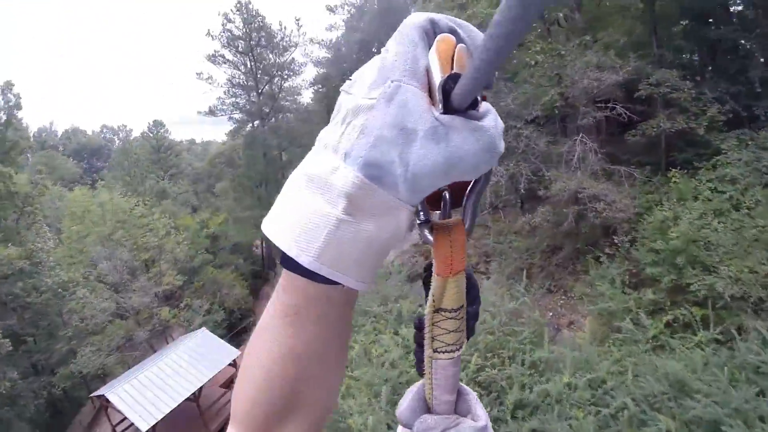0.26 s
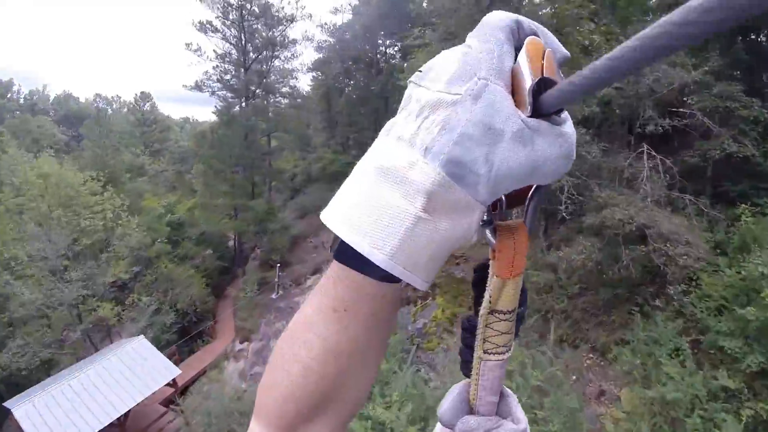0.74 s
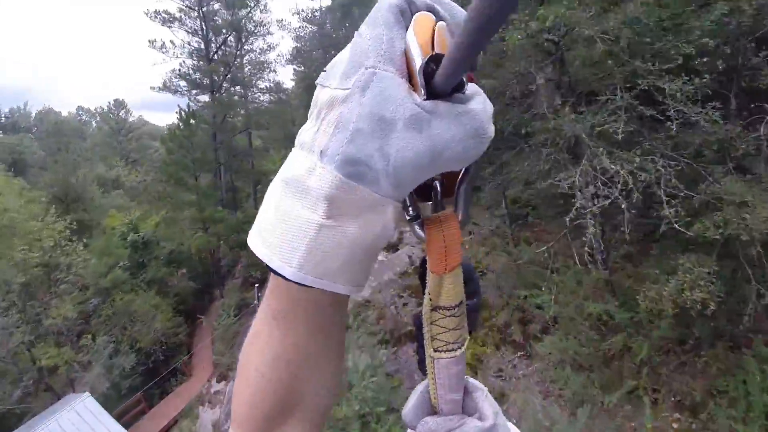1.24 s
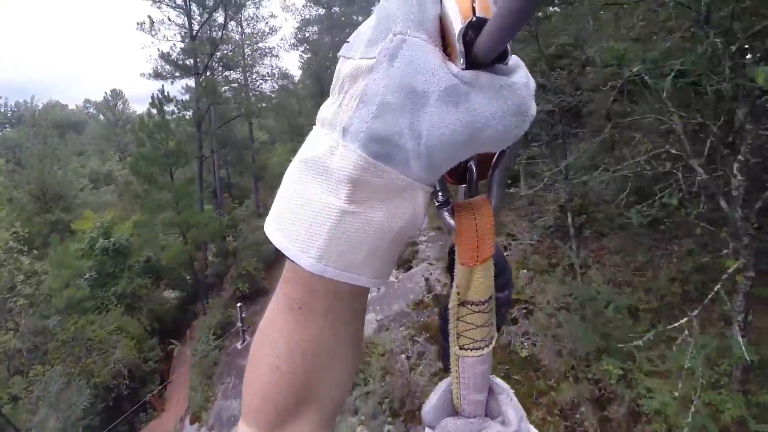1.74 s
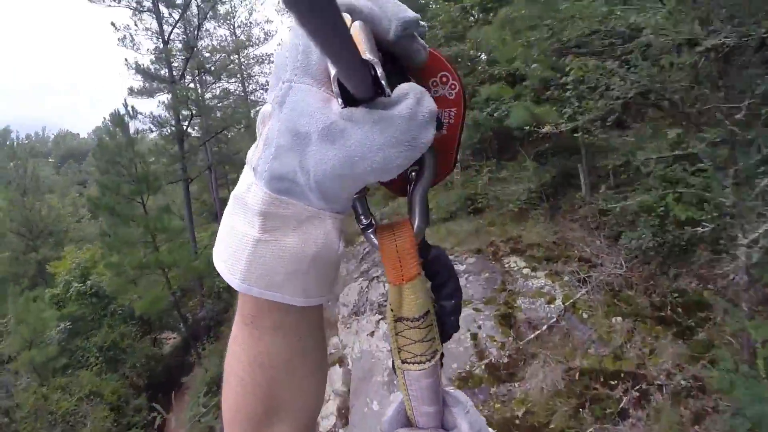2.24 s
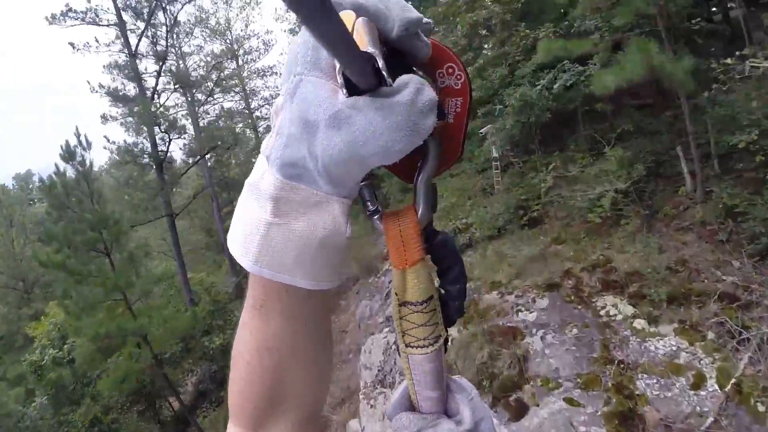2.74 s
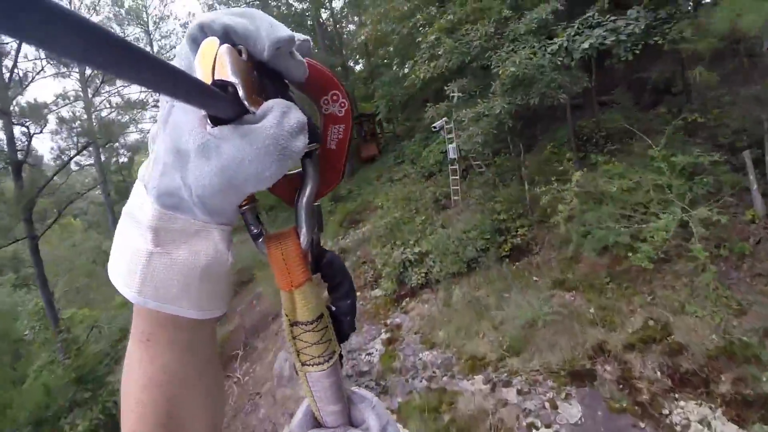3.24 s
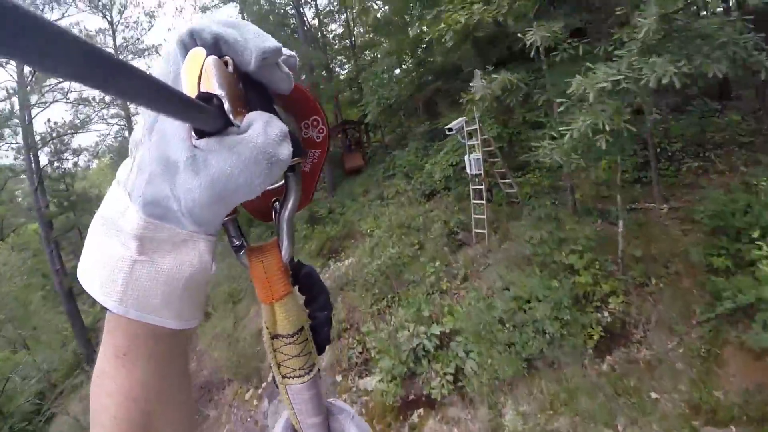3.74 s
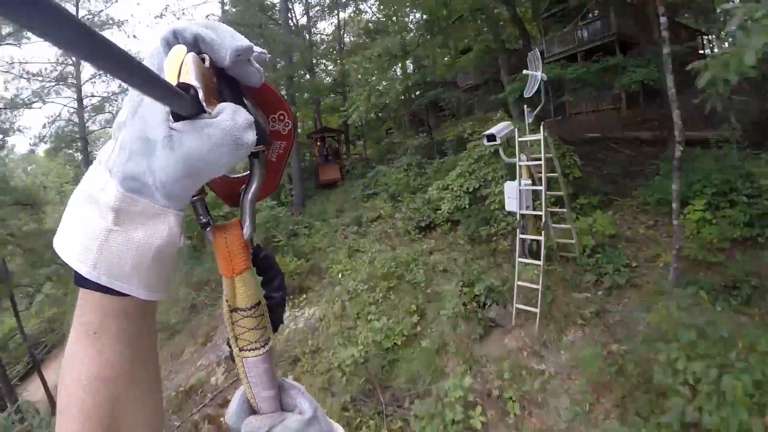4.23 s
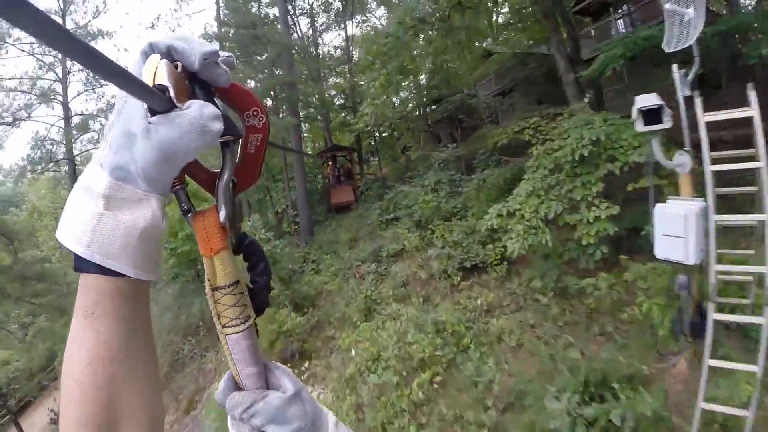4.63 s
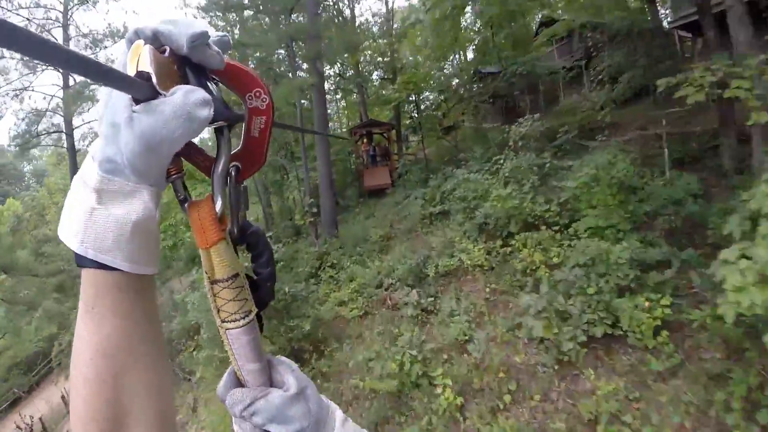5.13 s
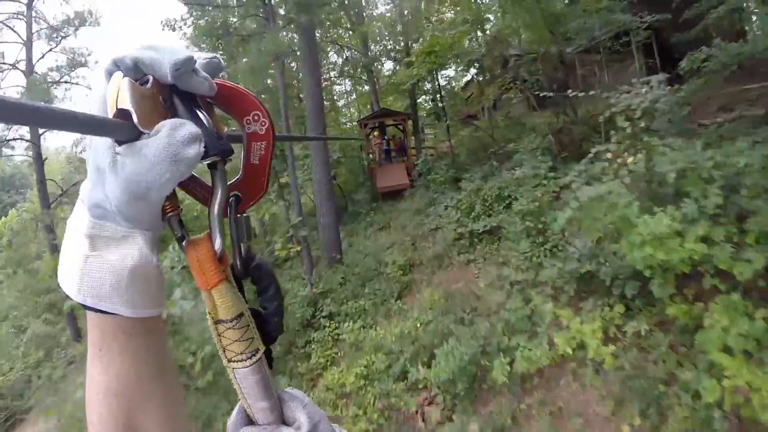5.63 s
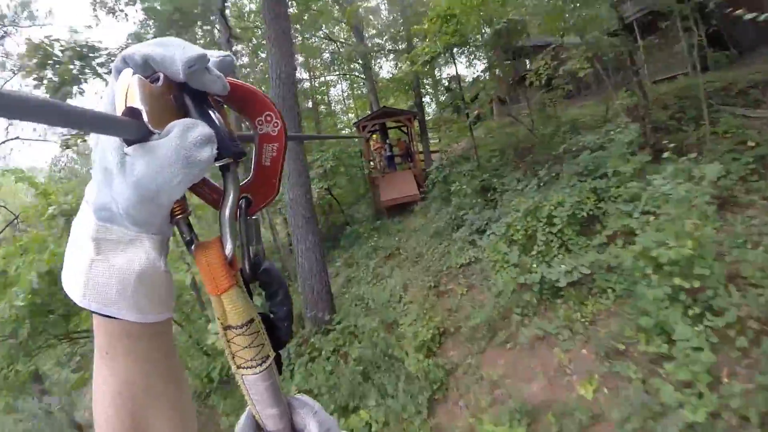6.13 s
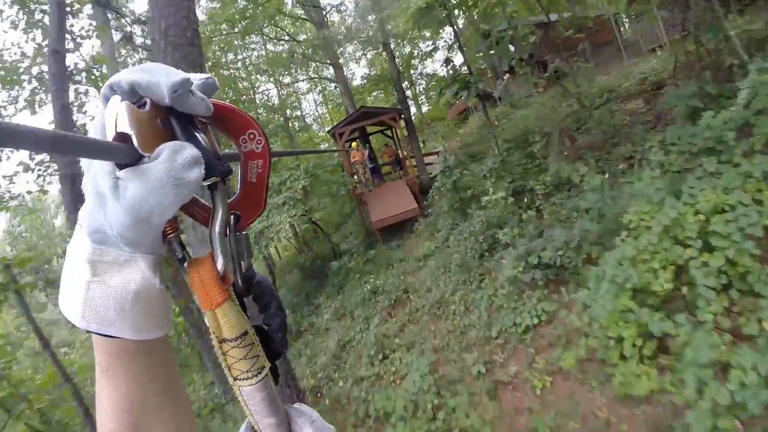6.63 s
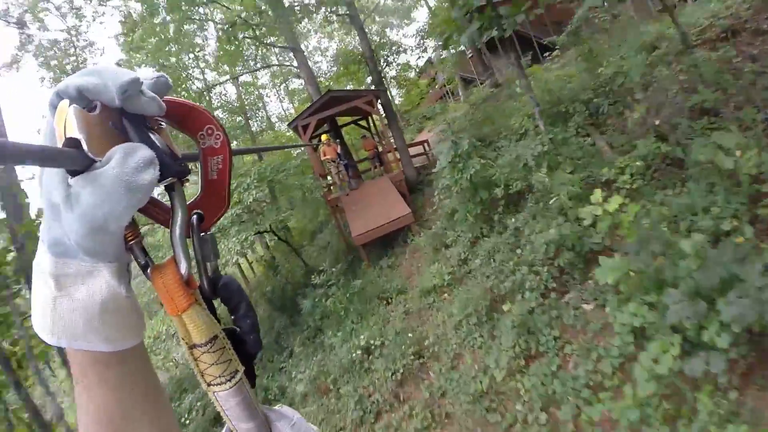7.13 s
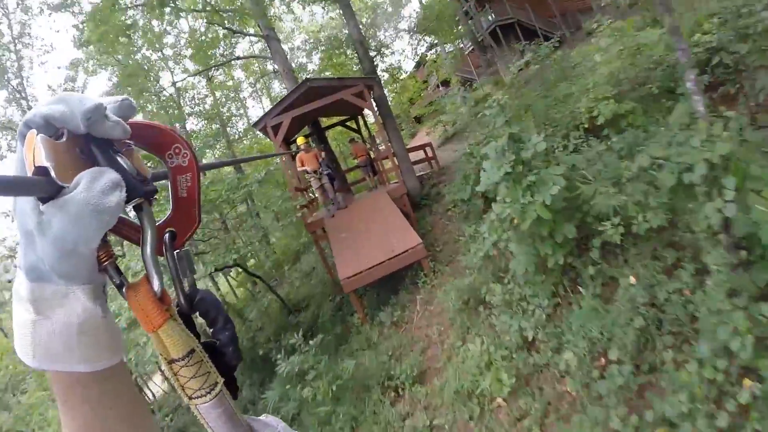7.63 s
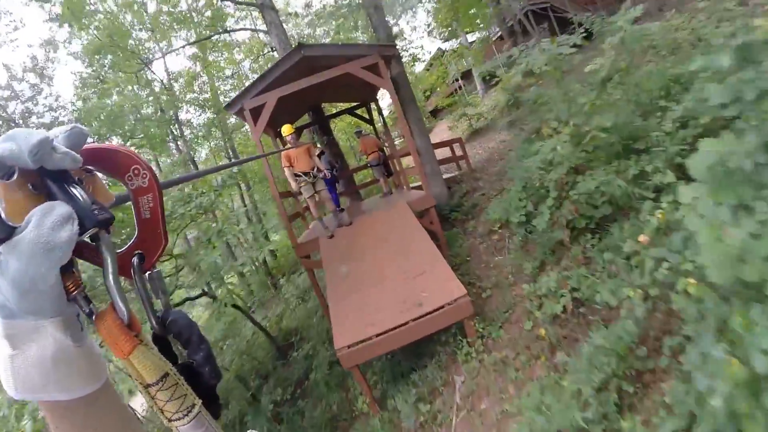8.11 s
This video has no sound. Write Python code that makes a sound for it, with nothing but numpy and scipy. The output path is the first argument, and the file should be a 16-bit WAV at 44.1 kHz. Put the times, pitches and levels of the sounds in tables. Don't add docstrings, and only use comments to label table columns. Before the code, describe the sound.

A zipline trolley grinds and rings loudly along a steel cable, its metallic whir shifting in tone as wind rumbles close to the rider's helmet.

```python
import sys
import numpy as np
from scipy import signal
from scipy.fft import rfft, irfft
from scipy.io import wavfile
from scipy.ndimage import uniform_filter1d

SR = 44100
rng = np.random.default_rng(int(sys.argv[2]) if len(sys.argv) > 2 else 0)


def unload_audio(sound):
    columns = np.transpose(np.atleast_2d(sound))
    steps = np.round(np.clip(columns, -1, 1) * 32767)
    wavfile.write(sys.argv[1], SR, steps.astype(np.int16))


def convert_level_to_amplitude(level_db):
    exponent = np.asarray(level_db, float) / 20
    return 10 ** exponent


N = 369116
TIME = np.arange(N) / SR
CONTROL = 64


def rms_one(x):
    return x / np.sqrt(np.mean(x ** 2) + 1e-20)


def in_time(rows):
    s, *columns = np.transpose(rows)
    return [np.interp(TIME, s, c) for c in columns]


def bump(centre, length):
    return np.exp(-((TIME - centre) / length) ** 2)


def drift(rate):
    r = np.exp(-2 * np.pi * rate * 8 / SR)
    noise = rng.standard_normal(N // 8 + 8002)
    slow = signal.lfilter([1], [1, -2 * r, r * r], noise)[8000:]
    return np.interp(np.arange(N) / 8, np.arange(len(slow)), rms_one(slow))


def poles(hz, width_hz):
    r = np.exp(-np.pi * width_hz / SR)
    return np.array([1, -2 * r * np.cos(2 * np.pi * hz / SR), r * r])


def resonance(x, hz, width_hz):
    a = poles(hz, 1.885 * width_hz)
    b = (1 - a[2]) / 2 * np.array([1, 0, -1])
    once = signal.lfilter(b, a, x)
    return signal.lfilter(b, a, once)


def dead_spot(x, hz, width_hz, depth_db):
    return signal.lfilter(poles(hz, width_hz * convert_level_to_amplitude(depth_db)), poles(hz, width_hz), x)


# centre in seconds, length in seconds,
# loss in strand bumps per second.
DRAGS = [
    (2.5, .15, 3),
    (3.75, .15, 1.5),
    (5.9, .25, 1.5),
]
TOP_RATE_HZ, LOWEST_S, SAG_HZ_PER_S2 = 225.6, 3.3, 2.73


def strand_rate():
    drag = sum(loss * bump(s, length) for s, length, loss in DRAGS)
    return TOP_RATE_HZ - SAG_HZ_PER_S2 * (TIME - LOWEST_S) ** 2 - drag


# time in seconds, heading in steps of a sixth of a turn.
HEADING = [(0, -0.24), (.3, 0.0), (1.15, 0.17), (1.45, 1.0), (1.95, 1.3), (2.2, 2.0), (2.9, 2), (3.15, 3.0),
           (4.45, 3), (4.75, 4.0), (6.8, 4), (7.5, 5), (8.37, 5.0)]


def rider_heading():
    return in_time(HEADING)[0]


# time in seconds, level in dB.
BREEZE = [(0.0, -43), (0.37, -49.5), (0.4, -57), (0.42, -45.5), (3.71, -41.5), (4.68, -43.5), (4.99, -40),
          (5.04, -44.5), (6.04, -49), (6.32, -46.5), (8.09, -49.5), (8.37, -48)]
# centre in seconds, length in seconds, lift in dB.
GUSTS = [(0.102, .06, 4), (.33, .08, -3), (0.81, .08, 5), (2.0, .05, -2), (2.7, 0.036, 3), (3.03, 0.088, 3),
         (3.45, 0.13, 3.5), (4.444, 0.085, 4), (5.8, 0.17, -3.5), (7.084, .05, 5), (7.44, 0.035, 4),
         (7.75, .12, 3.5)]
HUMP_DB, HUMP_FOLLOWS, HUMP_FADES_S, HUMP_FADE_DB_PER_S = -43.5, 0.51, 6.33, 5
RUSH_DB, RUSH_GROWS_DB_PER_S, RUSH_PER_HZ_DB = -55, 0.68, 0.08


def wind_levels():
    breeze_db, = in_time(BREEZE)
    buffet_db = breeze_db + 1 * drift(3.4)
    hump_db = HUMP_DB + HUMP_FOLLOWS * (breeze_db - breeze_db.mean())
    hump_db = hump_db - HUMP_FADE_DB_PER_S * np.maximum(TIME - HUMP_FADES_S, 0)
    hump_db = hump_db + sum(lift_db * bump(s, length) for s, length, lift_db in GUSTS)
    rush_db = RUSH_DB + RUSH_GROWS_DB_PER_S * TIME + RUSH_PER_HZ_DB * (strand_rate() - TOP_RATE_HZ)
    return buffet_db + 3.0, hump_db + 0.1, rush_db + 7.0


# frequency in Hz, density in dB per Hz.
WIND_COLOUR = [(12, -26), (20, 3), (48, -2), (108, -8), (157, 3.5), (201, -11.5), (245, -4), (293, -22),
               (339, -23), (537, -22.5), (653, -14.5), (733, -20), (877, -15), (1000, -13.5), (1300, -52),
               (2200, -120)]


def wind():
    hz, db = np.transpose(WIND_COLOUR)
    grid = np.fft.rfftfreq(N, 1 / SR) + 1
    air = rfft(rng.standard_normal(N)) * convert_level_to_amplitude(np.interp(np.log(grid), np.log(hz), db))
    part = np.digitize(grid, [105, 285])
    out = np.zeros(N)
    for k, level_db in enumerate(wind_levels()):
        out += convert_level_to_amplitude(level_db) * rms_one(irfft(air * (part == k), N))
    return out


# multiple, level off the mode in dB, mode in Hz,
# width in Hz, lift on the mode in dB.
ORDERS = [(2, -57, 484, 18, 4.5), (3, -62.5, 687, 31, 13), (4, -49, 890, 73, 5), (5, -52, 1136, 70, 3),
          (6, -49.5, 1355, 54, 15.5), (7, -47, 1390, 76, 16.5)]
TURNED_DB = [0.48, 0.63, 0.12, -0.25, 0.34, -1.9]
# multiple, # centre in seconds, length in seconds, change
# in dB.
MULTIPLE_SWELLS = [(2, 0.58, 0.84, -3.5), (2, 4.14, 0.43, -8), (4, 7.05, 0.51, -4), (4, 7.9, 0.23, 1), (5, 3, .25, 7),
                   (5, 1.9, .7, 6.5), (6, 7.2, .3, 5), (2, 2.9, .7, 4), (6, 2.05, .2, 6.5), (6, 4.0, 0.22, 4),
                   (3, 6.1, .5, 4), (2, 7.5, 0.81, 1), (6, 5.3, .4, -9)]


def whine_levels():
    heading, rate, levels_db = rider_heading(), strand_rate(), []
    for (multiple, db, hz, width_hz, lift_db), turned_db in zip(ORDERS, TURNED_DB):
        mode_db = lift_db / (1 + ((multiple * rate - hz) / width_hz) ** 2)
        swell_db = sum(change_db * bump(s, length)
                      for order, s, length, change_db in MULTIPLE_SWELLS if order == multiple)
        levels_db.append(db + mode_db + turned_db * heading + swell_db)
    return levels_db


# further level change of that multiple in dB, from the second upward.
MULTIPLE_DB = [-0.9, -1, 0.5, -0.5, -2, 0.5]


def whine(turn):
    out = np.zeros(N)
    for k, db in enumerate(whine_levels()):
        level = np.sqrt(2) * convert_level_to_amplitude(db + MULTIPLE_DB[k] + 1.05 * drift(10.0))
        out += level * np.sin((k + 2) * turn + 0.15 * k * drift(27))
    return out


# time in seconds, peak in dB.
KNOCKS = [(0.2598, -14), (4.3181, -9), (4.6803, -11), (5.0484, -8), (5.9479, -7), (6.5221, -10),
          (6.7136, -11), (7.1018, -10), (7.2045, -9), (7.2634, -10), (7.3517, -11), (7.434, -12),
          (7.9853, -12), (8.1693, -14)]


def contact_force(turn, level_db):
    swell = convert_level_to_amplitude(1.6 * np.cos(turn) + 2.6 * np.cos(2 * turn))
    flutter = convert_level_to_amplitude(0.34 * drift(7.5) + 1.03 * drift(72) + 1.0 * drift(260))
    grit_size = convert_level_to_amplitude(2.9 * np.minimum(rng.exponential(1, N), 3.5))
    grit = (rng.random(N) < 350 / SR) * grit_size
    knocks = np.zeros(N)
    at = [round(s * SR) for s, db in KNOCKS]
    knocks[at] = convert_level_to_amplitude(np.array(KNOCKS)[:, 1] - level_db[at] + 4)
    fade = np.exp(-1 / (0.00035 * SR))
    strength = swell * flutter + signal.lfilter([1], [1, -fade], 0.5 * grit + knocks)
    snaps = 1.8 * grit * rng.choice([-1, 1], N) + 4 * knocks
    smooth = rng.standard_normal((3, N))
    return smooth, rms_one(strength * smooth + snaps)


# centre in seconds, length in seconds, # nearby
# pitch in Hz, change in dB.
MODE_SWELLS = [(.1, .2, 3900, -5), (.15, .2, 9500, -4), (.35, .4, 13300, -4), (1.25, .15, 1420, -2.5),
               (1.5, .4, 13500, 4), (2.3, 0.29, 5460, 3.5), (3.898, 0.26, 1380, 2.5), (4.2, 0.28, 4850, -3.5),
               (4.1, .4, 8600, -4), (4.9, .4, 9900, 5), (7.2, .4, 4900, 3.5), (7.4, .5, 12000, 2),
               (5.9, .9, 11800, 6), (.15, .2, 11800, -5), (2.6, .4, 12000, -3), (3.65, .15, 12000, 4),
               (4.4, .15, 3020, 4.5), (1.5, 0.18, 5200, 1), (3.6, 0.58, 5600, 3), (7.8, 0.36, 7300, 4),
               (8.1, .3, 6550, -4)]


def mode_swell_db(hz):
    s, length, near_hz, db = np.transpose(MODE_SWELLS)[:, :, None]
    near_in_time = ((TIME[::CONTROL] - s) / length) ** 2
    near_in_pitch = (np.log2(hz / near_hz) / 0.1) ** 2
    return np.sum(db * np.exp(-near_in_time - near_in_pitch), axis=0)


# time in seconds, level in dB, brightness above 8 kHz in dB.
GRIND = [(0.0, -16, -4), (0.02, -19.5, 3), (1.28, -17, -2), (1.68, -15, -4.5), (2.82, -15, -2),
         (2.89, -16.5, -2), (3.01, -14.5, -0.5), (3.38, -17.5, 3), (3.98, -16, 2), (4.68, -19.5, 1.5),
         (6.25, -17, -1), (8.37, -21.5, -7)]
# frequency in Hz, width in Hz, # mean level in
# dB, lobe depth in dB, lobes per turn, heading of a lobe in steps.
TROLLEY_MODES = [(1082, 103, -10, 8, 0.5, -4.41), (1371, 78, -1.63, 1.3, 1.58, 0.96),
                 (1462, 93, -9.5, 9, 1.99, 0.61), (1687, 35.6, 4.5, 13, 0.5, -4),
                 (1808, 59.4, -0.94, 4.5, 0.99, -1.4), (2073, 174, -9.3, 2.3, 0.45, 5.5),
                 (2410, 154, -9, 1.5, 2.48, -0.8), (2626, 118, -1, 3, 1.5, 1.8),
                 (2798, 91, -0.16, 6.5, 0.983, -1.84), (2983, 112, 0.7, 2.5, 2, 1.78),
                 (3190, 97, -1.7, 5.5, 1.034, -2), (3420, 200, -3.5, 3, 0.35, 2.1),
                 (3660, 29, 1.5, 3.3, 1.98, 0.2),
                 (3800, 250, -6, 4.8, 0.51, -0.53), (3993, 250, -7.5, 0.9, 2.4, -2),
          (4516, 176, -5.5, 3, 0.71, 1.39), (4825, 182, -2.16, 3.75, 1.26, 1.39),
          (5140, 400, -8, 4.3, 1.7, -0.75), (5476, 320, -6, 2.5, 2.48, 1.4), (6040, 320, -6.5, 2.5, 2.5, 1),
          (6550, 334, -7.5, 4.9, 1.27, -1.34), (6797, 300, -7, 8.9, 0.995, -2),
          (7200, 545, -10.5, 1.9, 2.25, 0.8),
                 (8600, 400, -20, 7.8, 1.1, 1.87), (9850, 430, -22.5, 7.1, 0.99, 0.92),
         (10420, 430, -23.5, 2.9, 1.52, -1.96), (11300, 590, -28, 7.5, 1.2, 1.13),
         (12050, 550, -29, 5.2, 1.15, 1.2), (13400, 600, -30.5, 3.8, 2.24, -0.57),
         (14800, 600, -45.0, 3.8, 2.25, -1.32),
                 (2917, 45, -3.5, 7.2, 1.0, 4.3)]
# frequency in Hz, width in Hz, depth in dB,
# heading in steps from which it is heard.
DEAD = [(1970, 90, -5, 2.5), (3050, 80, -8, 2.8), (3625, 70, -9, -3), (4290, 110, -7, -3),
        (5000, 90, -9, 2.6), (5230, 150, -8, 4.0), (1600, 70, -6, 2.8), (2250, 150, -6, 4.0),
        (1225, 60, -5, .5), (7950, 250, -3, -3)]


def trolley(turn):
    level_db, bright_db = in_time(GRIND)
    heading = rider_heading()[::CONTROL]
    smooth, rough = contact_force(turn, level_db)
    out = np.zeros(N)
    for k, mode in enumerate(TROLLEY_MODES):
        hz, width_hz, db, lobe_db, lobes, aim = mode
        beam_db = lobe_db * np.cos(lobes * (heading - aim) * np.pi / 3)
        heard_db = np.repeat(db + mode_swell_db(hz) + beam_db, CONTROL)[:N]
        share = 1 / (1 + (3300 / hz) ** 3.6)
        force = (1 - share) * smooth[k % 3] + share * rough[k % 3]
        sway_db = 0.96 * share ** 2 * drift(2.0)
        gain = convert_level_to_amplitude(heard_db + sway_db + bright_db * (hz > 8000))
        out += gain * resonance(force, hz, width_hz)
    for hz, width_hz, depth_db, start in DEAD:
        reached = np.repeat(np.clip(heading - start, 0, 1), CONTROL)[:N]
        out = out + reached * (dead_spot(out, hz, width_hz, depth_db) - out)
    running_rms = np.sqrt(uniform_filter1d(out ** 2, size=SR))
    return convert_level_to_amplitude(level_db) * out / running_rms


def scene():
    unsteady_rate = strand_rate() * (1 + 0.004 * drift(10))
    turn = 2 * np.pi * np.cumsum(unsteady_rate) / SR
    return (wind() + whine(turn) + trolley(turn))[None]


def band_limit(x):
    return signal.sosfilt(signal.butter(12, 15220, fs=SR, output="sos"), x)


def record(dry):
    mix = 1.186 * np.tanh(dry / 1.205)
    return band_limit(mix)


dry = scene()
out = record(dry)
unload_audio(out)
```